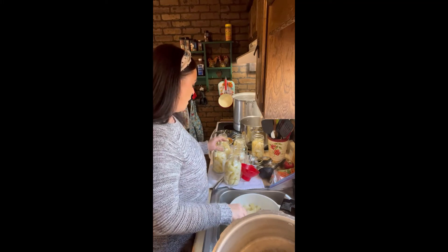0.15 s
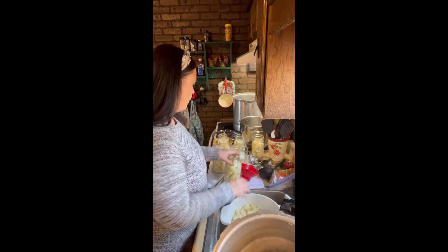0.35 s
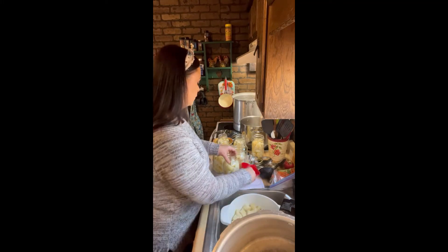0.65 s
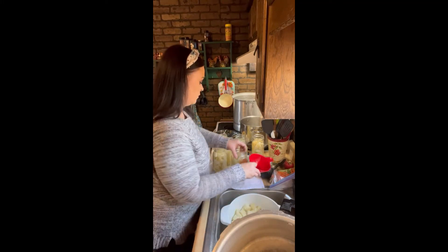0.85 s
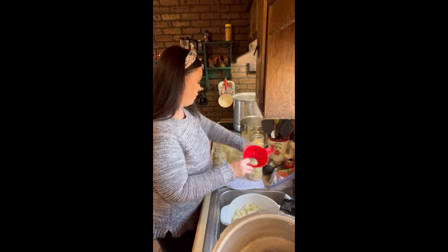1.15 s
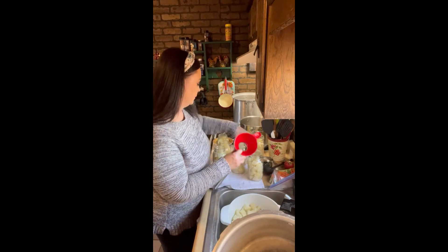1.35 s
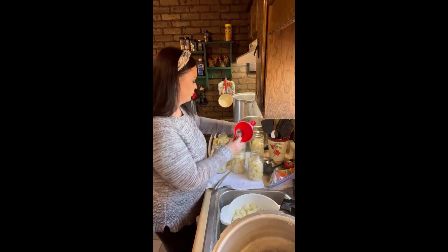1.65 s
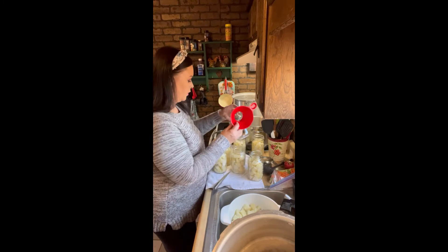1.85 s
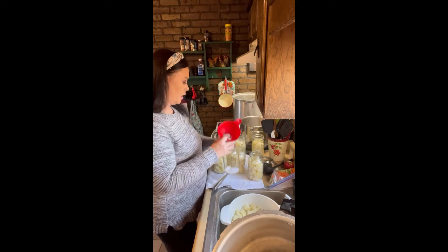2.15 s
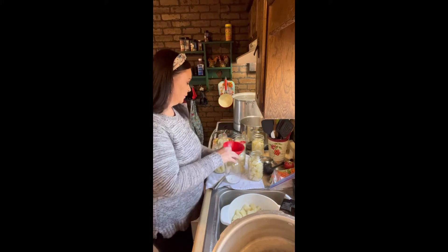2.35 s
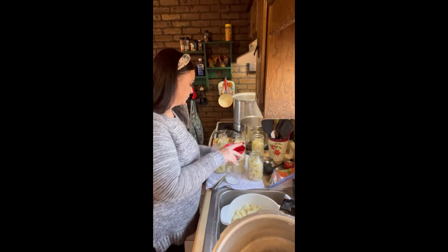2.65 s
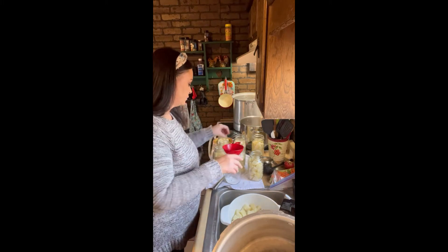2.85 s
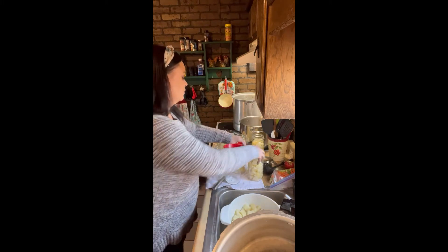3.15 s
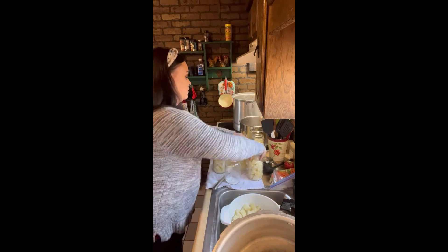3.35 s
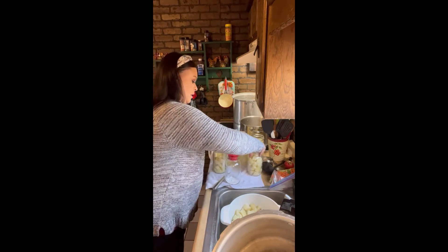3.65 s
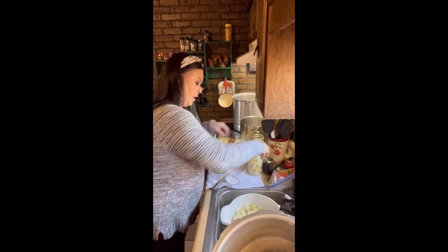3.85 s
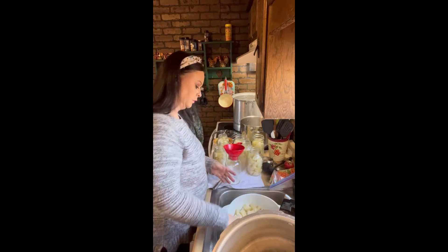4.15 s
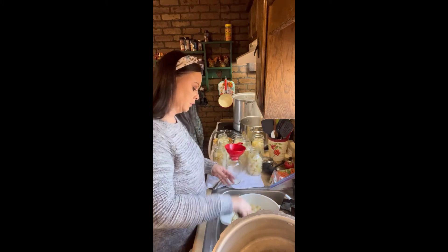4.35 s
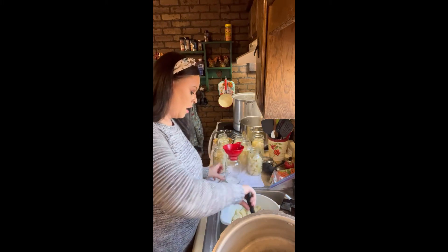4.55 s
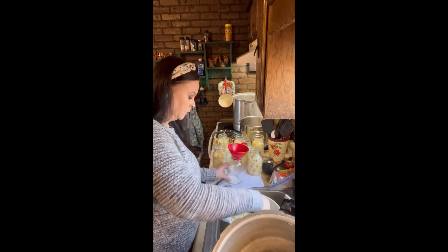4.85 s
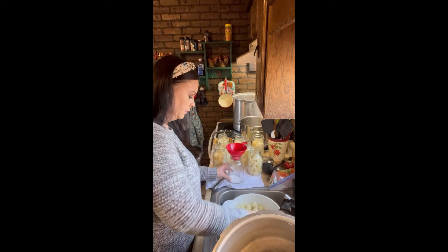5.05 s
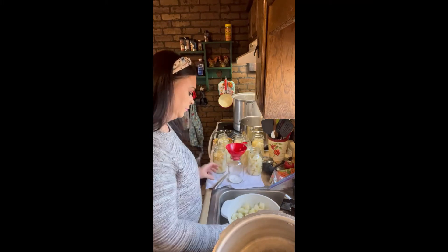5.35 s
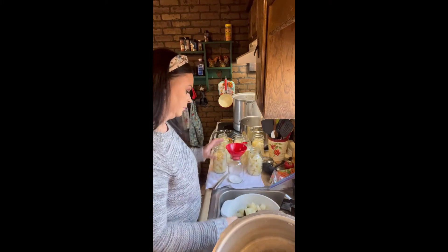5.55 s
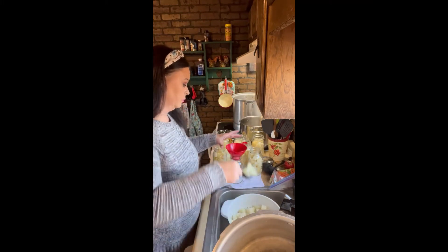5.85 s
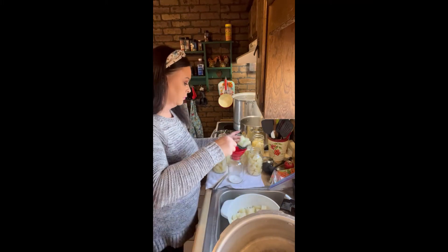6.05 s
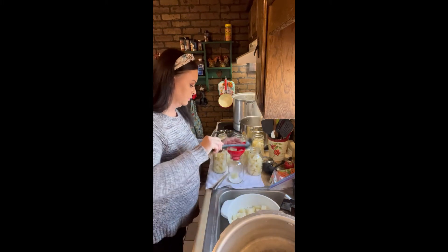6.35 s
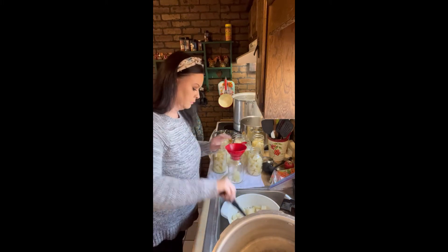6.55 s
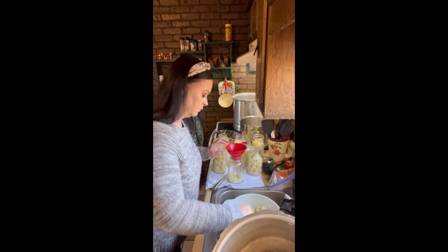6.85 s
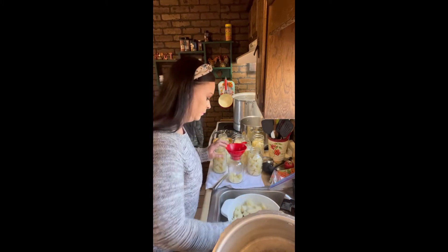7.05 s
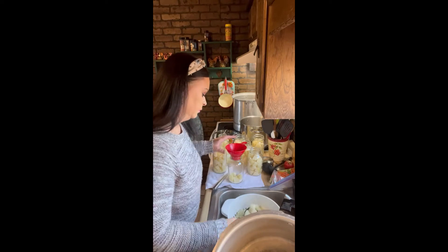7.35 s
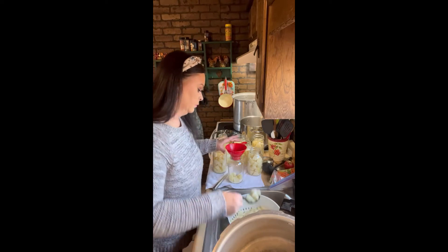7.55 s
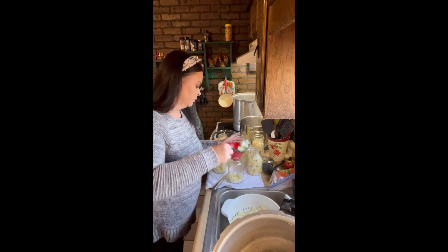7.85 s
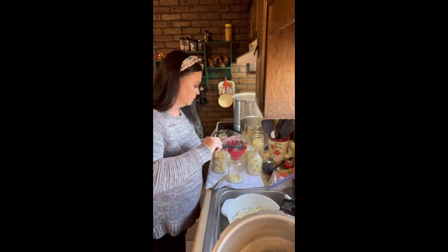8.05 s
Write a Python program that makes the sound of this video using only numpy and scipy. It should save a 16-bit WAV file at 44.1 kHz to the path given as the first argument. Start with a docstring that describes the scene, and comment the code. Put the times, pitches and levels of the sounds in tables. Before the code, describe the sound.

In a small damped kitchen, a sharp spoon knock on a bowl is followed by glass jars clashing and rattling in a wire rack. A plastic funnel taps dully on jar mouths, glass clinks again, then the spoon strikes the bowl and digs through wet food. Funnel knocks and another scoop follow. The counter thumps low while an appliance hums steadily. Close stereo microphones, dry and intimate.

```python
"""Jars and a bowl on a kitchen counter

Glass jars clink and rattle in a wire rack, a plastic funnel knocks on jar mouths and a metal spoon strikes a bowl:
noise cracks and damped sines, with fading noise ticks for the rattle and beating tones for lone glass notes.
The spoon digs through wet food (lumpy filtered noise), thin gliding sines whistle and the counter booms in modes.
An appliance hums in wavering sines over noise; a small damped room surrounds it, heard by two close ports."""
import sys
import numpy as np
from scipy import signal
from scipy.fft import rfft, irfft, next_fast_len
from scipy.io import wavfile
from scipy.ndimage import uniform_filter1d

SR = 44100
rng = np.random.default_rng(int(sys.argv[2]) if len(sys.argv) > 2 else 0)


def dump(signal):
    """Clip the signal to [-1, 1] and save it as 16-bit WAV at the path in sys.argv[1]."""
    limited = np.clip(np.atleast_2d(signal).T, -1, 1)
    pcm = np.round(limited * 32767).astype(np.int16)
    wavfile.write(sys.argv[1], SR, pcm)


N = 361619
TIME = np.arange(N) / SR

# spoon in the wet food, one list per spell: t/s, counter rumble/dB, squelch/dB, wet hiss/dB (relative levels)
DIGGING = [
    [(4.2, -57, -83, -87.5), (4.32, -52.5, -91, -77), (4.45, -70, -79, -94.5), (4.57, -45, -48, -59),
     (4.7, -46.5, -76, -74), (4.8, -43, -65, -68), (4.87, -40, -52, -58), (4.94, -42, -52, -57),
     (4.985, -45, -60, -63), (5.03, -40, -54, -58), (5.09, -36, -60, -63), (5.14, -36, -55, -61),
     (5.22, -35, -59.5, -65.5), (5.37, -34.5, -69, -76), (5.46, -49, -67, -80), (5.58, -41, -75, -73),
     (5.72, -52, -80, -72.5), (5.85, -54.5, -100, -100), (6.05, -76.5, -87, -98)],
    [(6.3, -55, -89, -83), (6.45, -47, -62, -60), (6.52, -57.5, -87, -81), (6.72, -34.5, -69, -65.5),
     (6.89, -40, -57, -62), (7.1, -43, -57.5, -62.5), (7.27, -43, -65, -70.5), (7.42, -46.5, -77, -102),
     (7.6, -50, -97, -94.5)],
    [(7.8, -74.5, -75.5, -92.5), (7.88, -75, -65, -73), (7.96, -75.5, -64.5, -62.5), (8.1, -45, -72, -66),
     (8.2, -47, -60, -80)],
]


def undb(db):
    """Turn dB into an amplitude factor."""
    return 10 ** (np.asarray(db) / 20)


def band(x, lo_hz, hi_hz):
    """Keep one frequency band."""
    return signal.sosfilt(signal.butter(2, [lo_hz, hi_hz], "bandpass", fs=SR, output="sos"), x)


def unit(x):
    """Scale to an rms of 1."""
    return x / np.sqrt(np.mean(x ** 2))


def along(table, hz):
    """Read an (f/Hz, value) table on a log-frequency axis."""
    f, value = np.transpose(table)
    return np.interp(np.log(hz + 1), np.log(f + 1), value)


def shape(x, gain):
    """Apply gain(Hz) to the spectrum of x."""
    n = next_fast_len(x.shape[-1] + 4096)
    hz = np.arange(n // 2 + 1) * SR / n
    return irfft(rfft(x, n) * gain(hz), n)[..., :x.shape[-1]]


def mode(x, hz, t60):
    """One ringing mode; an impulse of 1 rings at amplitude 1."""
    r, w = np.exp(-np.log(1000) / (t60 * SR)), 2 * np.pi * hz / SR
    return signal.lfilter([0, r * np.sin(w)], [1, -2 * r * np.cos(w), r * r], x)


def gains(tables, column):
    """Gain over time from one dB column; inaudible outside the spans."""
    out = np.zeros(N)
    for t in map(np.array, tables):
        out += undb(np.interp(TIME, t[:, 0], t[:, column], -200, -200))
    return uniform_filter1d(out, size=400)


def walk(rate):
    """Random levels, rate of them per second, joined by slopes; spread a little under 1."""
    k = int(SR / rate)
    held = np.repeat(rng.standard_normal(N // k + 1), k)
    return uniform_filter1d(held, k)[:N]


def add(out, at, hz, db, t60, rise_ms, loose=1):
    """Add damped sines from sample at; they swell in, their phases differing by up to loose turns."""
    seconds = min(1.2 * np.max(t60), .9)
    t = TIME[:min(int(seconds * SR), N - at), None]
    sines = np.sin(2 * np.pi * (hz * t + loose * rng.random(np.size(t60))))
    wave = np.sum(undb(db - 60 * t / t60) * sines, axis=1)
    out[at:at + len(t)] += wave * (1 - np.exp(-t[:, 0] * 1000 / rise_ms))


def strike(blows, modes, touch):
    """Each blow is a lumpy burst of contacts, a hollow note and two short knocks; the modes ring in a new mix."""
    (crack_ms, rise_ms, ring_db, knock_db, bright_db, bright_hz,
     scatter_db, octaves, hollow_t60, hollow_ms, knock_t60, broad_db) = touch
    # bands of hollow, knock, bright and sheen, one row each: low f/Hz, high f/Hz
    bands = [(200, 400), (400, 2600), (2300, 8000), (8000, 16000)]
    detune, hollow_split = .02, .05  # shares of f: grip and load shifting the modes, hollow note's neighbours
    b = np.array(blows)
    at = (b[:, 0] * SR).astype(int)
    colour_db = b[:, [1]] + np.stack([b[:, 2], 0 * b[:, 1], b[:, 3], b[:, 4]], axis=1)
    out, t = np.zeros(N), TIME[:8000] * 1000  # t in ms
    crack = np.exp(-t / crack_ms) * (1 - np.exp(-t / rise_ms)) ** 2  # contact builds up softly
    bounces = undb(2.9 * walk(220))

    # a narrower crack around each blow's own knock pitch; the root evens out the level between bandwidths
    for i, row in zip(at, b):
        lo, hi = row[6] * 2. ** (np.array([-.5, .5]) * np.clip(octaves, .4, 3))
        burst = band(crack * rng.standard_normal(len(t)), lo, hi) * np.sqrt(SR / 2 / (hi - lo)) / 2
        out[i:i + len(t)] += (undb(row[1]) * burst)[:N - i] * bounces[i:i + len(t)]

    # the broad crack in four bands
    for k, (lo, hi) in enumerate(bands):
        envelope = np.zeros(N + SR)
        for i, db in zip(at, colour_db[:, k] + broad_db * (k == 1)):
            envelope[i:i + len(t)] += undb(db) * crack
        noise = envelope[:N] * bounces * rng.standard_normal(N)
        out += band(noise, lo, hi) * np.sqrt(SR / 2 / (hi - lo)) / 2

    hz, db, t60 = np.transpose(modes)
    which = np.searchsorted([hi for lo, hi in bands], hz)  # the band whose level drives each mode
    chances = rng.standard_normal((len(b), 2, len(modes)))
    neighbours = np.array([-1, 0, 1])
    for i, row, colour, chance in zip(at, b, colour_db, chances):
        mode_db = colour[which] + db + ring_db + scatter_db * np.clip(chance[0], -2, 1)
        add(out, i, hz * (1 + detune * chance[1]), mode_db, t60, rise_ms)
        hollow_hz = row[5] * (1 + hollow_split * neighbours)
        add(out, i, hollow_hz, colour[0] - np.array([13, .5, 13]), np.full(3, hollow_t60), hollow_ms)
        # each pitched knock is a blur of three quickly damped neighbours that start nearly in step
        spread = 1 + 0.082 * neighbours + 0.015 * chance[1, :3]
        blur_hz = np.outer([row[6], bright_hz], spread).ravel()
        blur_db = np.repeat(colour[1:3] + [knock_db, bright_db] - 2, 3)
        add(out, i, blur_hz, blur_db, np.repeat([knock_t60, .02], 3), rise_ms, loose=.15)
    return out


def chatter(blows, modes, per_s, rule):
    """Glass chatters on: each blow opens a fading stream of uneven ticks, heard dry and through the modes."""
    under_db, fade_db_per_s, ring_db, sheen_db = rule
    b, jolts = np.array(blows), np.zeros(N)
    jolts[(b[:, 0] * SR).astype(int)] = undb(b[:, 1] + b[:, 3] + under_db)
    shake = signal.lfilter([1], [1, -undb(-fade_db_per_s / SR)], jolts)
    ticks = (rng.random(N) < per_s / SR) * undb(3.5 * rng.exponential(size=N))
    grit = uniform_filter1d(ticks, size=60) * rng.standard_normal(N)
    # the modes ring half as long as after a clean blow
    ring = sum(undb(db) * mode(ticks * rng.standard_normal(N), hz, .5 * t60) for hz, db, t60 in modes)
    dry = unit(band(grit, 830, 14000)) + undb(sheen_db) * unit(band(grit, 5300, 21000))
    return shake * (undb(-8) * dry + undb(ring_db) * unit(ring))


def bowl():
    """A metal spoon strikes the bowl, whose modes from the low mids up ring briefly."""
    # blows: t/s, knock level/dB, hollow, bright and sheen level over the knock/dB, hollow f/Hz, knock f/Hz
    bowl_blows = [(0.32, -30.5, -6, -2.5, -14, 232, 1150), (0.3405, -9.5, -26, -10, -19.5, 286, 885),
                  (0.349, -15, -2.5, -24, -34, 250.5, 630), (0.358, -23.5, -11.5, -22, -36, 257, 601),
                  (4.51, -21, -7, -28.5, -18, 254, 460), (4.516, -24, -16.5, -20.5, -23, 240, 1303),
                  (4.525, -22, -4, -20, -23, 248, 640), (4.538, -27, -13, -12, -23, 250, 1470),
                  (4.65, -27.5, -29, -8.5, -15, 277, 1220), (4.654, -33.5, -20, -25, -30, 275, 777),
                  (4.791, -55, -7, -5, -18, 255, 900), (4.828, -28, -5, -10, -18, 255, 520),
                  (4.843, -36, -7, -7, -20, 255, 600), (4.905, -31, -4.5, -2, -22, 247, 1504),
                  (4.911, -29, -8, -14, -27, 245.3, 690), (4.928, -41, -6, -8, -25, 242, 1720),
                  (4.999, -33, 1, -7, -29, 243, 490), (5.02, -40, -4, -6, -25, 244, 900),
                  (5.134, -43, -6, -3, -25, 244, 1390), (5.151, -30.5, -10, 0, -24, 247, 514),
                  (5.161, -41, -8, -16, -26, 245, 1320), (5.245, -43.5, 10.5, -16, -28, 248, 800),
                  (5.313, -42, -12, -17, -34, 249, 494), (5.354, -50, -10, -8, -25, 244, 900),
                  (5.395, -49, -8, -8, -19, 244, 700), (5.438, -62, -3, 6, -10, 244, 900),
                  (5.54, -62, -3, 4, -10, 244, 900), (5.626, -62, -3, 5, -8, 244, 700),
                  (5.472, -52, -1, -12, -29, 249, 500), (5.699, -63, -3, 7, -8.5, 263, 462),
                  (6.665, -20, -15, -19, -19, 288.6, 809), (6.67, -21.5, -8.5, -24, -39, 253, 1260),
                  (6.685, -27, -14, -21, -28, 295, 1990), (6.706, -29.5, -16, -18, -30, 287, 1400),
                  (6.765, -40.5, -11, -5, -13, 240, 830), (6.859, -40.5, -5, -19, -28, 240, 1030),
                  (6.967, -30, -14, -13, -20, 285, 500), (7.049, -47, -3, -0.5, -26, 247, 493),
                  (7.371, -51, 16.5, -27, -20, 247, 452)]
    # modes of the bowl: f/Hz, relative level/dB, t60/s
    bowl_modes = [(448.6, -9.5, 0.084), (478.5, -3.5, 0.08), (595, -5.5, 0.24), (680, -2.5, 0.2),
                  (830, 1.5, 0.04), (1097, -5, 0.1), (1190, -10, 0.095), (1490, -6, 0.15),
                  (2026, -12, 0.033), (2146, -12.5, 0.07), (2458, -11.5, 0.074), (1750, -4, .05),
                  (2850, 1, .03), (3350, -2, .03), (4400, -3, .03)]
    # shared by all blows: crack decay/ms, rise/ms, ring level/dB, knock note level/dB, bright note level/dB,
    # bright note f/Hz, mode scatter/dB, knock width/octaves, hollow t60/s, hollow rise/ms, knock t60/s,
    # broad part of the knock/dB
    bowl_touch = (6.5, .8, -17.5, -2, -6.5, 2403.5, 4.5, 1.38, 0.22, 4.5, 0.017, -5)
    return undb(-1.0) * strike(bowl_blows, bowl_modes, bowl_touch)


def funnel():
    """A plastic funnel knocks on jar mouths; its modes die within a tenth of a second."""
    # blows: t/s, knock level/dB, hollow, bright and sheen level over the knock/dB, hollow f/Hz, knock f/Hz
    funnel_blows = [(2.124, -54, -14, -12, -22.5, 269, 1750), (2.15, -54, -7.5, -25, -29.5, 274, 1750),
                    (2.266, -55, -7, -29.5, -19, 335, 1510), (2.303, -39.5, -6, 7, -4, 303, 1150),
                    (2.316, -50, 11, -10, -20, 320, 600), (2.368, -45, 16, -10, -20, 321, 1200),
                    (2.359, -25.5, -10, 1.5, -20, 321, 1220), (2.494, -33, -2.5, -2.5, -15, 268.7, 1240),
                    (2.507, -31, -9.5, -14, -20, 269, 624), (2.696, -50.5, 6, 2, -29, 298, 1010),
                    (2.714, -39, -3.5, -12.5, -30, 304.5, 1225), (2.894, -29.5, -18, -5, -19, 303, 1104),
                    (2.903, -29.5, -9.5, -10, -29, 291, 1006), (3.153, -46.5, -4.5, -0.5, -27, 294, 980),
                    (3.392, -49.5, -10, -15.5, -14.5, 270.6, 878),
                    (3.411, -46, -10.5, -5.5, -14.5, 274, 870), (4.069, -57.5, 0, -22, -25, 268, 1170),
                    (6.233, -62, 3.5, -6, -21.5, 269, 1140), (6.279, -40.5, -5, -1.5, -24.5, 282, 957),
                    (6.303, -29.5, 4, -0.5, -2.5, 302, 955), (6.344, -39.5, 7, -10, -26, 269, 1100),
                    (6.424, -54.5, 18, 2, 4, 274, 1190), (6.489, -56.5, 17.5, -8, 4, 286.5, 960),
                    (6.554, -66, 19, -1, 7.5, 284, 710), (6.595, -63, 11, -5, 7, 297, 716),
                    (8.059, -30.5, -10, -2, -15, 309, 1170), (8.099, -37.5, 11, -25, -30, 296, 1150),
                    (8.129, -43, 5, -18, -27, 314, 740), (8.161, -38, 7, 2, -18, 286, 694)]
    # modes of the funnel: f/Hz, relative level/dB, t60/s
    funnel_modes = [(450, -8.5, 0.1), (592, -4, .1), (1150, -9, .06), (1770, -19, .05), (3320, -5, 0.05),
                    (4040, 2, 0.055), (4600, -11, 0.045), (6050, -2.5, 0.038)]
    # what its blows share; columns and units as for the bowl
    funnel_touch = (10, 0.68, -11, -6, -4.5, 4101, 4.5, 1.5, 0.25, 7, 0.05, -6)
    return undb(-1.0) * strike(funnel_blows, funnel_modes, funnel_touch)


def rack():
    """Jars hit the wire rack: bright modes ring, then glass chatters against wire."""
    # blows: t/s, knock level/dB, hollow, bright and sheen level over the knock/dB, hollow f/Hz, knock f/Hz
    rack_blows = [(0.646, -49.5, 2, -13, -28, 331, 600), (0.668, -54, 3, -3, -20, 330, 805),
                  (0.726, -34, -11, -3, -14, 289, 1460), (0.765, -42, -9, 1.5, 4, 240, 870),
                  (1.071, -26.5, -13, -4, -7.5, 262, 855), (1.081, -30, -13, 0, -8, 262, 1100),
                  (1.091, -24, -20.5, -9, -18, 310, 850), (1.11, -30, -19, -5, -13, 257, 1300),
                  (1.125, -28, -19, -6.5, -13.5, 257, 1450), (1.16, -30, -11.5, 2, 2, 216, 890),
                  (1.188, -38, -11.5, 5, 4, 216, 1400), (1.207, -23.5, 3, -1.5, 8, 220.2, 620),
                  (1.225, -35, -11.5, 7.5, 3, 226, 1190), (1.249, -37.5, -16, 8, -9.5, 219, 1460),
                  (1.14, -31, -19, -6, -13, 257, 1400), (1.27, -40, -16, 3, 0, 219, 1900),
                  (1.292, -43, -16, 2, 0, 219, 1100), (1.379, -43, -11.5, -15.5, -22, 283, 1190),
                  (1.471, -50, -7, -6, -18.5, 291, 802), (1.512, -62, -4.5, -8, -17, 291, 810)]
    # modes of jars and wire: f/Hz, relative level/dB, t60/s
    rack_modes = [(3650, -7.5, 0.1), (3980, -6.5, 0.13), (4600, -9.5, 0.067), (5420, -10.5, .09),
                  (6370, -6.5, .15), (6560, -4.5, 0.15), (6700, -7.5, 0.15), (7060, -11.5, 0.068),
                  (8150, 0, 0.13), (10300, -10.5, 0.099), (13100, -10, .1), (13030, -8.5, 0.11),
                  (13930, -10.5, .08), (13400, -9, .1)]
    # what the blows share; columns and units as for the bowl
    rack_touch = (15, 1.46, -7.5, -7, -8.5, 6546, 2.5, 2.5, 0.13, 3, 0.0667, -4)
    # rattle: level over the bright crack/dB, fade/dB per s, ring level/dB, sheen level/dB
    rack_chatter = (-7.5, 260, -5, -8.5)
    blows = strike(rack_blows, rack_modes, rack_touch)
    return undb(-1.0) * blows + chatter(rack_blows, rack_modes, 250, rack_chatter)


def jars():
    """Glass jars clink: high modes ring and the glass rattles on in dense ticks."""
    # blows: t/s, knock level/dB, hollow, bright and sheen level over the knock/dB, hollow f/Hz, knock f/Hz
    jar_blows = [(0.165, -56, -23.5, -6, -20.5, 262, 560), (0.199, -59.5, -2, -11, -26, 261, 1230),
                 (1.586, -46.5, -23.5, -12, -22.5, 253, 619), (1.627, -31, -17.5, -4, -16.5, 290, 1014),
                 (1.663, -33.5, -8, 13, 13.5, 310, 740), (1.704, -42.5, -9.5, -3, -8.5, 304, 750),
                 (1.805, -44, -30.5, 19, 27, 340, 1245), (1.817, -45.5, -6.5, 20.5, 28, 341, 1780),
                 (1.844, -44.5, -15, -0.5, 22, 332, 1826), (3.529, -39, -21.5, 15.5, 19, 268, 1113),
                 (3.543, -35, -17, 12, 15, 239, 1190), (3.587, -40, -23, 15, 19.5, 312, 1970),
                 (3.687, -42.5, -6.5, 16, -5, 272, 2020), (3.756, -45, -7, 6, 8, 292, 1470),
                 (3.799, -46, -7, -1.5, -17, 266, 1336), (4.221, -63.5, -1, -3.5, -15, 286, 603),
                 (4.259, -64.5, 14, 3, -15, 274, 501), (4.318, -50, 0.5, -1.5, -36, 316, 618)]
    # modes of the glass: f/Hz, relative level/dB, t60/s
    jar_modes = [(3000, -11.5, 0.23), (3520, -5, 0.08), (4060, -6.5, 0.14), (4570, -6.5, 0.047),
                 (5420, -5.5, 0.082), (6520, -4.5, 0.19), (7350, -4, 0.1), (7400, -10.5, 0.11),
                 (8930, -2, 0.063), (9870, 2.5, 0.089), (11000, -10, 0.034), (13350, -7.5, 0.081),
                 (13400, -8.5, .1), (14300, -8.5, .08)]
    # what the blows share; columns and units as for the bowl
    jar_touch = (12.5, .9, -11, -1, -7.5, 4102, 3, 1.64, 0.17, 3, 0.03, -5)
    # rattle: level over the bright crack/dB, fade/dB per s, ring level/dB, sheen level/dB
    jar_chatter = (-12, 280, -9.5, -6.5)
    blows = strike(jar_blows, jar_modes, jar_touch)
    return undb(-1.0) * blows + chatter(jar_blows, jar_modes, 400, jar_chatter)


def pings():
    """Lone glass tones, each of three close partials that beat; the more damped, the wider the split."""
    # single jars struck clean ring on one note: t/s, f/Hz, relative level/dB, t60/s
    notes = [(0.17, 4200, -58, 0.12), (.166, 3000, -59, 0.11), (.164, 2370, -59, 0.13),
             (0.16, 1800, -63.5, .15), (.2, 1400, -63.5, 0.052), (0.16, 4650, -63, .08),
             (.74, 6380, -48, 0.29), (0.73, 5350, -60, .25), (1.095, 3600, -35.5, 0.084),
             (1.161, 6900, -34, .05), (1.16, 7600, -38, .3), (1.187, 6620, -31, .2),
             (1.185, 6330, -36, .35), (1.21, 6650, -31, .1), (1.245, 6640, -32, .25),
             (1.21, 4400, -32, .05), (1.225, 3200, -33, .05), (1.235, 4300, -35, .05),
             (1.21, 5400, -35, .04), (1.21, 2000, -35, .08), (1.245, 3800, -35, .06),
             (1.262, 3000, -35.5, 0.066), (1.275, 6900, -38.5, .06), (1.208, 3900, -30.5, 0.066),
             (1.23, 3630, -33.5, .12), (1.37, 3650, -55, 0.14), (1.435, 4450, -60, .3),
             (1.627, 985, -26, 0.07), (1.627, 3050, -30, 0.04), (1.632, 4270, -33, 0.09),
             (1.637, 2820, -34, .1), (1.663, 4700, -33, .1), (1.665, 3250, -30, 0.06),
             (1.664, 6500, -34, .05), (1.664, 5500, -39, .04), (1.705, 4010, -46, .07),
             (1.68, 3500, -36, .04), (1.675, 2900, -36, .05), (1.72, 4720, -49, .25),
             (1.735, 3300, -41, 0.05), (1.762, 3300, -43, .05), (1.812, 5240, -28, 0.088),
             (1.818, 3472, -33.5, .063), (1.82, 4118, -41, .2), (1.815, 6200, -33, 0.088),
             (2.122, 1750, -49, .03), (2.135, 1900, -55, .06), (2.15, 1600, -55, .06),
             (2.125, 4200, -62, .04), (2.265, 1500, -55, .03), (2.695, 4080, -53, 0.12),
             (2.3, 3950, -41.5, 0.03), (2.905, 3100, -45, .05), (2.955, 3100, -57, 0.2),
             (3.531, 4100, -31.5, .07), (3.535, 5300, -34, .1), (3.588, 3700, -34, 0.06),
             (3.587, 6500, -36, .04), (3.54, 4650, -37, .05), (3.689, 3500, -32, 0.057),
             (3.688, 4900, -35, .03), (3.76, 3700, -48, .04), (3.805, 4463, -61, 0.5),
             (3.8, 3700, -49, .05), (3.78, 6350, -51, .07), (3.77, 5420, -59, .2), (3.8, 2100, -50, .1),
             (3.995, 3300, -75, .08), (4.22, 3100, -66, .12), (4.32, 4150, -54, 0.03),
             (4.32, 5950, -56, .03), (4.215, 4680, -72, 0.08), (4.26, 4680, -73, .3),
             (4.215, 6550, -67, .04), (4.215, 5300, -72, .05), (4.27, 3200, -71, .15),
             (6.44, 4300, -55, .04), (6.455, 4120, -60, 0.25), (6.417, 3270, -60, .08),
             (6.6, 4150, -62, .1), (6.74, 3270, -52, .05), (6.299, 4250, -56, 0.17), (6.5, 4300, -66, 0.13),
             (6.55, 4400, -66, 0.14), (6.58, 3300, -64, 0.1), (8.161, 4000, -46, .12)]
    split, rise_ms = 3.5, 1.5  # split in Hz times t60 in s
    out = np.zeros(N)
    for (s, hz, db, t60), chance in zip(notes, rng.random((len(notes), 3))):
        partials = hz + split / t60 * (np.array([-1, 0, 1]) + chance - .5)
        add(out, int(s * SR), partials, db + np.array([-7, -.3, -7]), np.full(3, t60), rise_ms)
    return out


def food():
    """Wet pieces slide and suck apart: lumpy squelch, gritty scrape and a fine hiss above it."""
    wet = rng.standard_normal(N) * undb(4.5 * walk(35) + 3 * walk(160))
    squelch = unit(band(wet, 300, 1300)) + undb(-5.0) * unit(band(wet, 1300, 2800))
    grit = rng.standard_normal(N) * undb(2.8 * walk(150) + 3.2 * walk(30))
    hiss = unit(band(grit, 1730, 8050)) + undb(-4.0) * unit(band(grit, 7100, 18700))
    return gains(DIGGING, 2) * unit(squelch) + gains(DIGGING, 3) * unit(hiss)


def counter():
    """Soft pushes and the rumble of digging shake the worktop, which booms in its low modes."""
    # loads landing on the counter: t/s, relative level/dB
    loads = [(0.054, -41.5), (0.34, -21), (0.661, -37.5), (0.738, -39.5), (1.07, -29), (1.197, -14),
             (2.356, -45), (2.484, -15), (3.596, -43), (3.748, -41), (4.511, -35.5), (4.652, -33.5),
             (4.829, -31.5), (5.005, -34), (5.148, -33), (5.304, -28.5), (5.486, -31.5), (5.638, -33.5),
             (6.305, -39), (6.448, -35.5), (6.666, -35), (6.967, -27.5), (7.029, -29)]
    # modes of the worktop: f/Hz, relative level/dB, t60/s
    worktop = [(61.7, -2.5, 0.24), (96.4, 0, 0.26), (123.3, 1, 0.14), (156, 0.5, 0.11), (178.9, -6, 0.18),
               (253.4, -7.5, 0.26)]
    push_ms = 5.67
    n = int(push_ms * SR / 1000)
    push = np.zeros(N + SR)
    for s, db in loads:
        start = int(s * SR)
        push[start:start + n] -= undb(db) * np.hanning(n) * 2 / n

    def boom(x):
        """Ring all worktop modes."""
        return sum(undb(db) * mode(x, hz, t60) for hz, db, t60 in worktop)

    bumps = rng.standard_normal(N) * undb(3 * walk(25))
    return undb(-3.0) * boom(push[:N]) + gains(DIGGING, 1) * unit(boom(bumps))


def whistle():
    """Faint gliding tones that flutter in level and pitch."""
    # thin whistle while the loaded spoon swings across, one curve per strand: t/s, f/Hz
    strands = [
        [(5.965, 12300), (5.99, 13000), (6.01, 13150), (6.04, 12500)],
        [(6.025, 13100), (6.045, 13500), (6.065, 14400), (6.095, 15100), (6.125, 15300), (6.16, 14900),
         (6.19, 13900), (6.228, 12300)],
        [(6.052, 12400), (6.085, 13500), (6.108, 14400), (6.116, 13500), (6.15, 12700)],
        [(7.555, 12200), (7.59, 13150), (7.62, 12750), (7.66, 13200), (7.68, 14200), (7.71, 14800),
         (7.74, 15300)],
        [(7.6, 13650), (7.625, 13900), (7.675, 15500), (7.73, 15300), (7.77, 15650)],
        [(7.755, 15100), (7.78, 14150), (7.81, 14100), (7.838, 12500)],
    ]
    level_db, flutter_db, wobble_hz = -84, 6.5, 140
    out = np.zeros(N)
    for strand in map(np.array, strands):
        hz = np.interp(TIME, strand[:, 0], strand[:, 1]) + wobble_hz * walk(120)
        on = uniform_filter1d(1. * (TIME > strand[0, 0]) * (TIME < strand[-1, 0]), size=400)
        level = on * undb(level_db + flutter_db * walk(70))
        out += level * np.sin(2 * np.pi * np.cumsum(hz) / SR)
    return out


def appliance():
    """Hum lines that waver in level and pitch, in the first field, over steady room noise in both."""
    # hum lines: f/Hz, relative rms level/dB
    lines = [(59.2, -56.5), (91.5, -59), (177.6, -75), (253.0, -68), (355.3, -74.5), (446.8, -80)]
    # spectrum of the room noise: f/Hz, relative density/dB
    floor = [(25, -13.5), (92, -6), (170, -22.5), (270, -15), (451, -28.5), (659, -35.5), (2050, -45),
             (6380, -57), (9000, -60.5), (13200, -55.5), (16000, -58)]
    floor_db = -56
    hum = np.zeros(N)
    for hz, db in lines:
        level = np.sqrt(2) * undb(db + 0.49 * walk(5.6))
        wavering_time = TIME + np.cumsum(.015 * walk(6)) / SR
        hum += level * np.sin(2 * np.pi * hz * wavering_time)
    air = shape(rng.standard_normal((2, N)), lambda hz: undb(along(floor, hz)))
    return hum * np.array([[1], [0]]) + undb(floor_db) * unit(air)


def room(x):
    """Two fields: the direct sound and its scattering off the crowded worktop, each with its own noise tail."""
    # decay time of the room: f/Hz, t60/s
    decay = [(150, .35), (600, 0.26), (2500, 0.32), (7000, 0.23), (14000, 0.15)]
    tail_db = -5.5  # tail energy against the direct sound
    t, tail = TIME[:SR // 2], 0
    for hz in 70 * 2. ** np.arange(8):
        noise = band(rng.standard_normal((2, len(t))), hz, min(2 * hz, 17000))
        tail = tail + noise * undb(-60 * t / along(decay, 1.2 * hz))
    tail = tail * (1 - np.exp(-t / 0.0067))
    tail *= undb(tail_db) / np.sqrt(np.mean(np.sum(tail ** 2, axis=1)))
    near = 1. * (t == 0)
    for lag in (11, 23, 41):  # samples between jars; each allpass smears time and keeps the tone
        gap = np.zeros(lag - 1)
        near = signal.lfilter(np.r_[-.6, gap, 1], np.r_[1, gap, -.6], near)
    tail[0, 0] += 1
    tail[1] += near / np.sqrt(np.sum(near ** 2))
    return signal.fftconvolve(x[None], tail, axes=1)[:, :N]


def scene():
    """Sum the sources in the room, then add the hum and the boom."""
    blows = bowl() + funnel() + rack() + jars()
    fields = room(blows + pings() + whistle() + food()) + appliance()
    boom = counter()  # comes straight and, 300 samples later, off the wall
    return fields + np.array([boom, np.roll(boom, 300)])


def record(dry):
    """Both ports share one field in part, with a phase shift that turns with frequency; both ends are cut."""
    # phase between the ports: f/Hz, left lead/rad
    lead = [(0, 0), (1500, -1.2), (2500, -2.5), (3700, -6.28), (5500, -5.2), (8300, -3.35), (10200, -2.85),
            (11800, -1.3), (14000, 0), (16000, .6)]
    # likeness of the ports: f/Hz, share from 0 to 1
    likeness = [(60, .995), (150, .99), (300, .97), (600, .6), (1500, .4), (3000, .25), (5500, .55),
                (7500, .7), (8300, .95), (10200, .92), (11500, .6), (14000, .97), (16000, .85)]
    # balance of the ports: f/Hz, left minus right level/dB
    balance = [(100, 0), (500, -2), (2000, 2), (3500, .5), (16000, 0)]
    # the housing lifts the upper middle: f/Hz, level/dB
    housing = [(1500, 0), (2200, 1.0), (2900, 3.0), (3800, 0)]
    bass_cut_hz, top_hz = 49.6, 15800

    def like(hz):
        """Likeness at each frequency."""
        return np.clip(along(likeness, hz), 0, 1)

    out = []
    for side in (1, -1):  # left, right
        def turn(hz):
            """Level and phase of this port."""
            level = undb(along(housing, hz) + side * along(balance, hz) / 2)
            return level * np.exp(.5j * side * np.interp(hz, *np.transpose(lead)))

        shared = shape(dry[0], lambda hz: turn(hz) * np.sqrt((1 + like(hz)) / 2))
        opposed = shape(dry[1], lambda hz: turn(hz) * side * np.sqrt((1 - like(hz)) / 2))
        out.append(shared + opposed)
    bass_cut = signal.butter(6, bass_cut_hz, "highpass", fs=SR, output="sos")
    top_cut = signal.ellip(8, .2, 70, top_hz, fs=SR, output="sos")
    return signal.sosfilt(top_cut, signal.sosfilt(bass_cut, np.array(out)))


dry = scene()
out = record(dry)
dump(out)
```